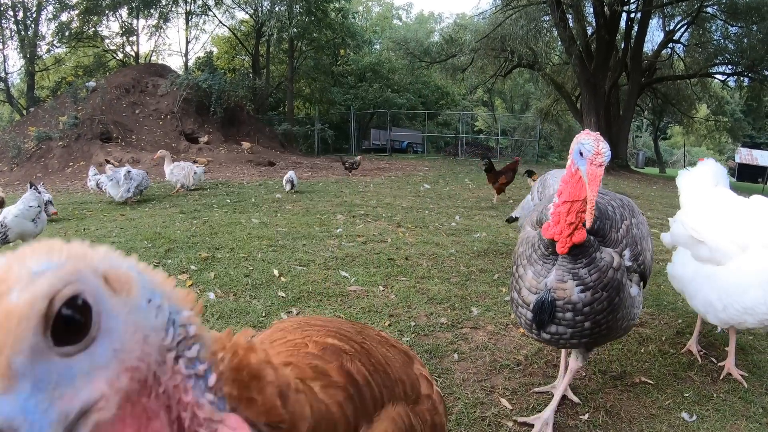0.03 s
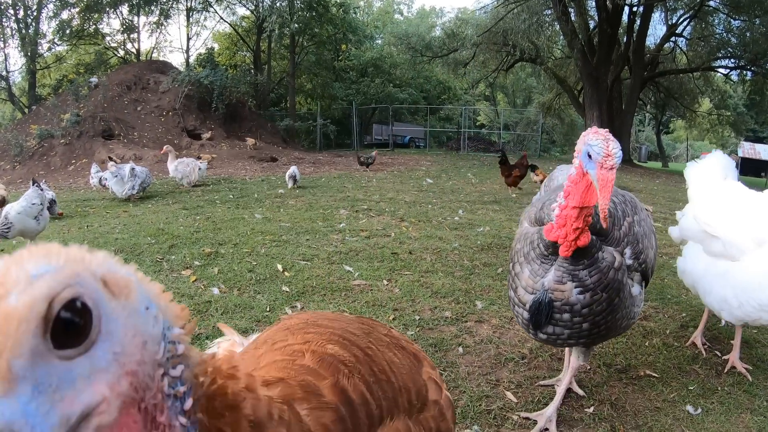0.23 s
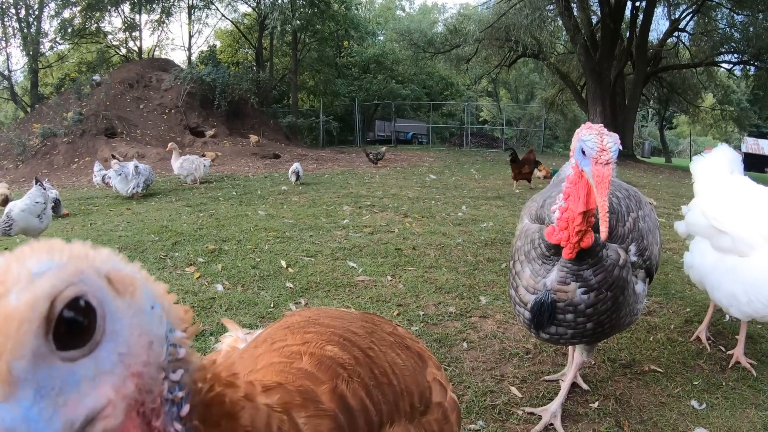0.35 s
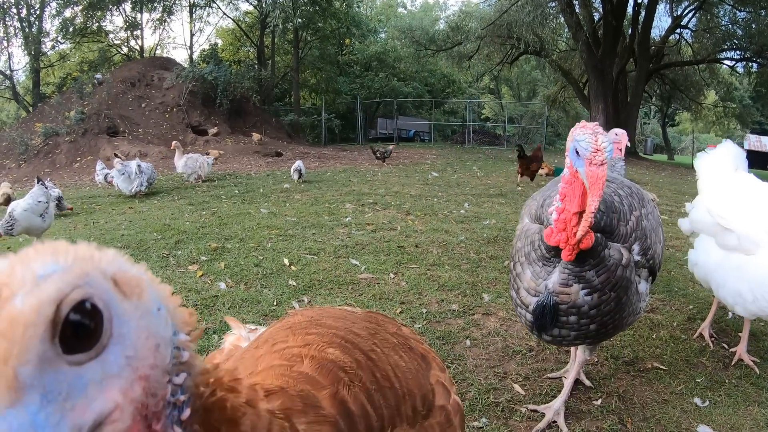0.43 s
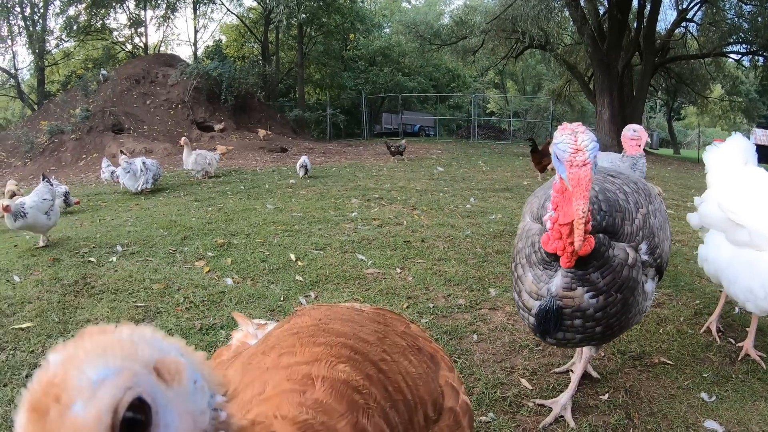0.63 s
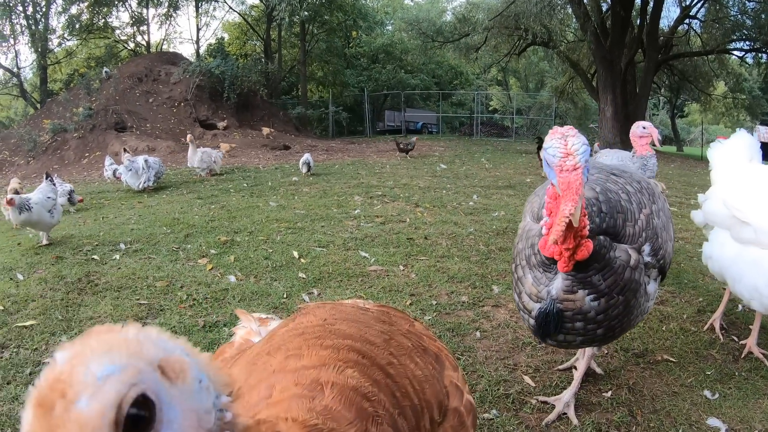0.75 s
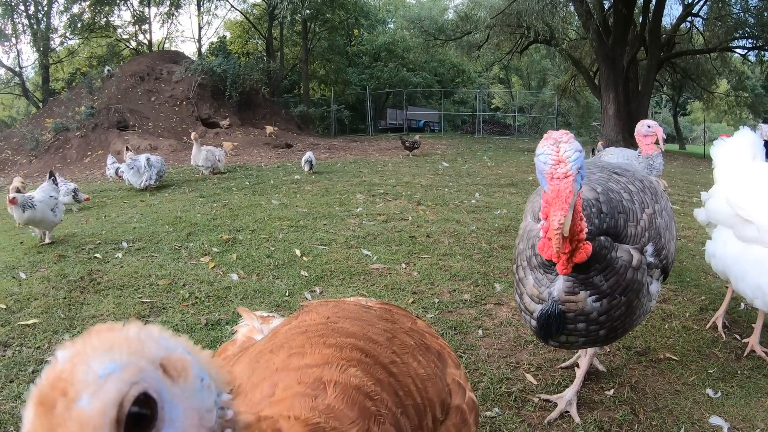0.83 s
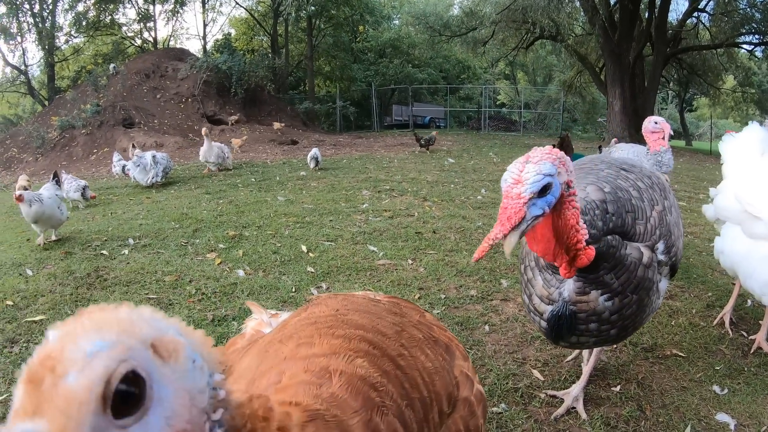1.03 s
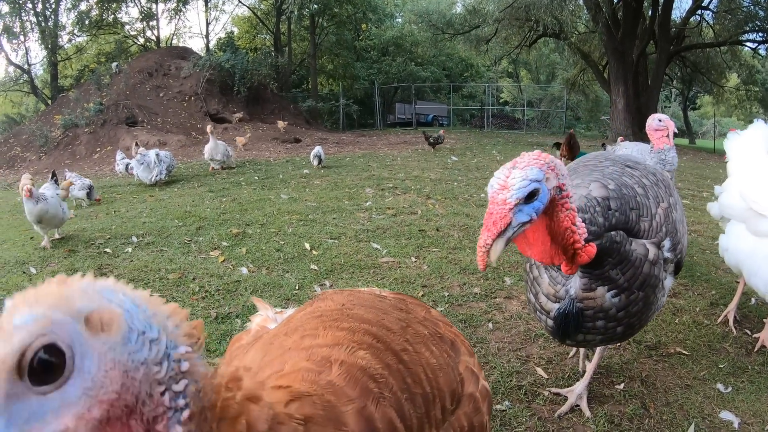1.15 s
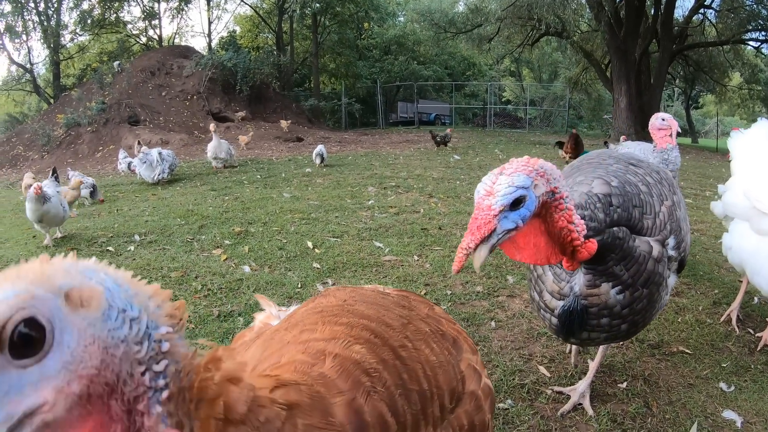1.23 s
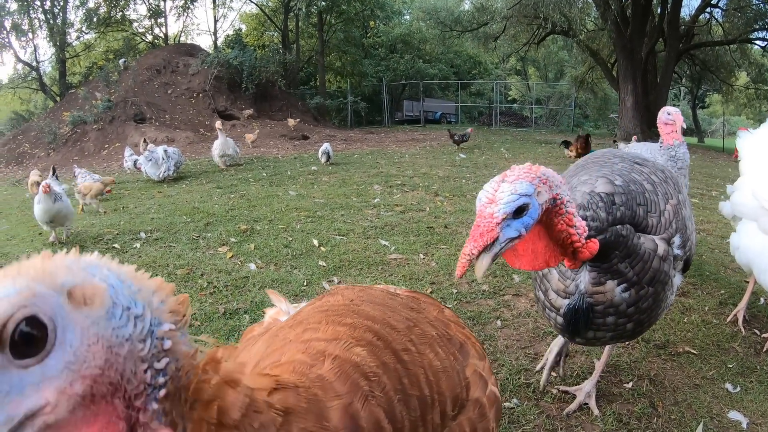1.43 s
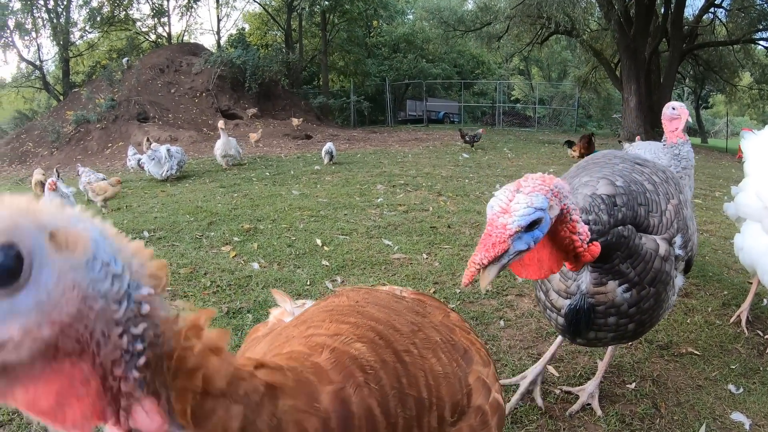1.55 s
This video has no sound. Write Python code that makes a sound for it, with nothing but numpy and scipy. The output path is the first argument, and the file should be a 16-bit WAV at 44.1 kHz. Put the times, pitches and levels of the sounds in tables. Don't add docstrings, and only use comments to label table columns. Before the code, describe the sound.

A turkey yelps loudly three times close by on the right, over a quiet farmyard.

```python
import sys
import numpy as np
from scipy import signal
from scipy.io import wavfile
from scipy.ndimage import uniform_filter1d

SR = 44100
rng = np.random.default_rng(int(sys.argv[2]) if len(sys.argv) > 2 else 0)


def to_wav(s):
    ch = np.atleast_2d(s).T
    pcm = np.round(np.clip(ch, -1, 1) * 32767)
    wavfile.write(sys.argv[1], SR, pcm.astype(np.int16))


def gain_from_db(level_db):
    decades = np.asarray(level_db, float) / 20
    return 10 ** decades


N = 70560

# pitch in Hz, strength in dB per Hz.
AIR_SPECTRUM = [(15, -41.5), (25, -7.5), (205, -1), (366, -14), (616, -18.5), (768, -18), (2200, -28.5),
                (3000, -40.5), (3900, -67), (6600, -120)]
# pitch in Hz, strength in dB per Hz.
LEAF_SPECTRUM = [(1760, -46), (3000, -12.5), (4430, -6.5), (5090, -13), (10600, -25), (11800, -41),
                 (14500, -46), (22000, -120)]
# pitch in Hz, likeness from -1 to 1.
LEFT_RIGHT_LIKENESS = [(30, 0.79), (200, 1), (1000, -0.2), (4000, 0.97), (8000, -0.38)]
# peak time in seconds, length in seconds, level in dB, centre in Hz.
RUSTLE_PUFFS = [(.112, .2, -65, 5300), (.352, .03, -71, 8000), (.85, .01, -78, 9500),
                (1.368, .012, -80, 13000), (1.43, .2, -70, 1800), (.548, .04, -58, 2900),
                (.555, .03, -72, 7000), (1.245, .04, -82, 12000), (.76, .03, -61, 3200),
                (.725, .1, -59, 2800), (.96, .1, -59, 2000), (1.05, .11, -64, 2800), (1.49, .16, -54, 320),
                (.25, .5, -62, 2600), (1.14, .12, -57, 600), (.96, .12, -53, 350)]
# start in seconds, peak level in dB, pitch in Hz.
FOOT_THUDS = [(.178, -35, 462), (.541, -40, 342), (.591, -40, 460), (1.082, -51, 548), (1.267, -48, 190),
              (1.27, -58, 580), (1.367, -50, 504), (1.378, -48.5, 246), (1.482, -38.5, 330),
              (1.531, -42, 318), (1.58, -41, 342)]
# start in
# seconds, # length in seconds, start pitch in Hz, end pitch in Hz, level in dB.
FAR_PEEPS = [(.093, .013, 2330, 2130, -62), (.103, .011, 2760, 2700, -57), (.112, .027, 2420, 1900, -60),
             (.104, .012, 5540, 5490, -61), (.111, .024, 4650, 3250, -58), (.096, .028, 6830, 6880, -63),
             (.185, .012, 7800, 7600, -70), (.385, .055, 5680, 5660, -72), (1.048, .068, 3440, 2950, -58),
             (1.055, .055, 4300, 3850, -64), (1.104, .035, 3560, 2450, -60), (1.05, .045, 2800, 2600, -66),
             (1.1, .035, 2850, 2350, -65)]
# start in seconds, length in seconds, pitch in Hz, level in dB.
HEN_NOTES = [
    (.334, .038, 1415, -52),
    (.388, .04, 1415, -55),
    (.805, .04, 1430, -65),
]

YELP_1_RISE = [(.195, 660, -62, -20), (.201, 745, -39, -17), (.212, 1010, -32, -19), (.219, 1130, -38, -3),
               (.225, 1200, -42, -2), (.232, 1200, -42, -6), (.246, 1130, -64, -18)]
YELP_1_HOLD = [(.276, 1230, -62, -14), (.286, 1140, -45, -9), (.299, 1095, -38, -11),
               (.312, 1000, -40, -24), (.32, 985, -41, -15), (.33, 995, -36, -24), (.342, 995, -35, -13),
               (.349, 995, -33.5, -21),
               (.354, 975, -34.5, -30), (.36, 970, -38, -6), (.366, 960, -34, -7), (.371, 965, -32, -18),
                 (.376, 985, -31.5, -33), (.385, 845, -34.5, -5), (.393, 905, -35, -4), (.4, 880, -30, -17),
                 (.407, 803, -31.5, -11)]
YELP_1_FALL = [(.422, 848, -29, -21), (.436, 773, -32, -9), (.454, 723, -32, -4), (.463, 755, -33, -9),
               (.481, 665, -31, 0), (.491, 652, -31.5, 1.5), (.499, 600, -36, -3), (.51, 510, -58, -13)]
YELP_2_RISE = [(.564, 600, -56, -4), (.57, 830, -29, -24), (.575, 1180, -26.5, -10),
               (.579, 1195, -24.5, -15), (.584, 1275, -22, -26), (.587, 1275, -32, -20),
               (.5875, 1640, -33, -15), (.596, 1625, -33, -16), (.612, 1610, -51, -20)]
YELP_2_FALL = [(.62, 1530, -43, -20), (.625, 1280, -35, -28), (.632, 1180, -27, -20),
               (.643, 1150, -27.5, -13), (.651, 1065, -31, -7), (.667, 990, -32, -30),
               (.678, 830, -28, -19), (.698, 738, -30, -10), (.711, 605, -33, -5), (.72, 440, -58, -7)]
YELP_3_RISE = [(.771, 590, -56, -15), (.777, 770, -26, -11), (.783, 900, -26, -16), (.786, 1200, -24, -17),
               (.79, 1272, -19, -27), (.7935, 1275, -27, -22), (.794, 1660, -28, -14),
               (.801, 1703, -32, -15), (.818, 1703, -68, -20)]
YELP_3_BREAK = [(.84, 2090, -66, -20), (.849, 2050, -40, -23), (.859, 1950, -40, -20),
                (.865, 1520, -34, -18), (.868, 1310, -29, -20), (.873, 1315, -22, -21),
                (.878, 1332, -22.5, -21)]
YELP_3_FALL = [(.885, 1240, -21, -34), (.889, 1150, -24, -26), (.898, 1165, -24.5, -17),
               (.908, 1050, -26.5, -11), (.914, 925, -27.5, -34), (.926, 880, -26.5, -33),
               (.936, 750, -28, -17), (.941, 640, -32, -2), (.946, 570, -36, -3), (.953, 450, -56, -16)]
# snap back in seconds, slack length in seconds, pitch sag as a share,
# level dip in dB.
VOICE_WARBLES = [
    (.3235, .006, .07, 9),
    (.342, .008, .11, 11),
    (.3645, .0125, .135, 12),
    (.3955, .001, 0, 11),
]
HIGH_OVERTONES_DB = [-18.5, -29.5]
# pitch in Hz, width in Hz, gain in dB.
WINDPIPE = [(1950, 250, 4), (2820, 150, 2), (3150, 110, 14), (3480, 150, 14)]

AIR_DB, LEAVES_DB, INSECT_DB = -53.5, -70, -68
INSECT_HZ, INSECT_WIDTH_HZ = 4250, 750
THUD_CYCLES, THUD_NOISE_DB = 18.4, -4.5
KNOCK_S, KNOCK_DB, KNOCK_HZ = .228, -39.5, 75
PEEP_BEND = 1.6
YARD_DB, YARD_T60_S = -35.5, 0.6
SAG_S, SNAP_S, DIP_S = .009, .006, .003
JITTER, SHIMMER_DB = .003, .5
BREATH_DB, PIPE_DIRECT_DB = -31, -12
VOICE_PAN_DB, TOP_PAN_DB, AIR_PAN_DB = -9, -4.5, -1.2
TOP_HZ, CUTOFF_HZ = 2100, 12500


def rms_one(x):
    return x / np.sqrt(np.mean(x ** 2) + 1e-20)


def at_hz(points, hz):
    points = np.array(points)
    return np.interp(np.log(hz), np.log(points[:, 0]), points[:, 1])


def drift(rate):
    r = np.exp(-2 * np.pi * rate / SR)
    noise = rng.standard_normal(N + SR // 2)
    return rms_one(signal.lfilter([1], [1, -2 * r, r * r], noise)[SR // 2:])


def resonance(hz, width_hz):
    r = np.exp(-np.pi * width_hz / SR)
    return (1 - r * r) / 2 * np.array([1, 0, -1]), [1, -2 * r * np.cos(2 * np.pi * hz / SR), r * r]


def butter(x, order, hz, kind="low"):
    return signal.sosfilt(signal.butter(order, hz, kind, fs=SR, output="sos"), x)


def pan(x, db):
    return x * gain_from_db(np.array([[db / 2], [-db / 2]])) * 2 / (gain_from_db(db / 2) + gain_from_db(-db / 2))


def banded_noise(spectrum, low_hz, count, patchy_db):
    out, together = 0, drift(4.7)
    edges = low_hz * 2 ** (np.arange(count + 1) / 3)
    white = rng.standard_normal((2, 2, N))
    for k, (low, high) in enumerate(zip(edges, edges[1:])):
        mid, side = butter(white[k % 2], 2, [low, high], "band")
        hz = np.sqrt(low * high)
        alike = np.clip(at_hz(LEFT_RIGHT_LIKENESS, hz), -1, 1)
        flicker = patchy_db * (0.66 * together + drift(22))
        gain = gain_from_db(at_hz(spectrum, hz) + flicker)
        out = out + gain * (np.sqrt(1 + alike) * mid + np.sqrt(1 - alike) * side * [[1], [-1]])
    return rms_one(out)


def air_and_traffic():
    return gain_from_db(AIR_DB) * banded_noise(AIR_SPECTRUM, 22, count=21, patchy_db=.9)


def leaves():
    return gain_from_db(LEAVES_DB) * banded_noise(LEAF_SPECTRUM, 2800, count=7, patchy_db=1.0)


def insects():
    noise = rng.standard_normal((2, N)) + 0.5 * rng.standard_normal(N)
    ring = resonance(INSECT_HZ, INSECT_WIDTH_HZ)
    level = gain_from_db(INSECT_DB + 0.53 * drift(25))
    return level * rms_one(signal.lfilter(*ring, signal.lfilter(*ring, noise)))


def rustles():
    t, out = np.arange(N) / SR, 0
    grains = rng.standard_normal((2, N)) * gain_from_db(1.9 * drift(300))
    grains = grains + 2.1 * rng.standard_normal(N)
    for s, length, db, hz in RUSTLE_PUFFS:
        band = butter(grains, 3, [hz / 1.4, hz * 1.283], "band")
        steepness = np.where(t < s, 10, 1.5)
        out = out + gain_from_db(db) * rms_one(band) * np.exp(-(steepness * (t - s) / length) ** 2)
    return out


def thuds():
    out, t = np.zeros(N + SR), np.arange(SR // 5) / SR
    noise = rng.standard_normal(N + SR)
    for s, db, hz in list(FOOT_THUDS) + [(KNOCK_S, KNOCK_DB, KNOCK_HZ)]:
        i = int(s * SR)
        rough = rms_one(signal.lfilter(*resonance(hz, 0.15 * hz), noise[i:i + len(t)]))
        rise = 1 - np.exp(-t * hz * 1.35)
        fade = gain_from_db(-60 * t * np.sqrt(350 * hz) / THUD_CYCLES)
        tone = np.sin(2 * np.pi * hz * t)
        out[i:i + len(t)] += gain_from_db(db + 4.5) * rise * fade * (tone + gain_from_db(THUD_NOISE_DB) * rough)
    return butter(out[:N], 2, 1500)


def peeps():
    out, wobble, flutter = np.zeros(N + SR), drift(200), gain_from_db(2.0 * drift(90))
    for s, length, start_hz, end_hz, db in FAR_PEEPS:
        u = np.linspace(0, 1, int(length * SR))
        i = int(s * SR)
        glide = start_hz + (end_hz - start_hz) * u ** PEEP_BEND
        hz = glide * (1 + .006 * wobble[i:i + len(u)])
        whistle = np.sin(2 * np.pi * np.cumsum(hz) / SR)
        out[i:i + len(u)] += gain_from_db(db + 2.0) * np.sin(np.pi * u) ** .5 * whistle
    return out[:N] * flutter


def hen():
    t, out = np.arange(N) / SR, 0
    for s, length, hz, db in HEN_NOTES:
        u = np.clip((t - s) / length, 0, 1)
        phase = 2 * np.pi * hz * t
        out = out + gain_from_db(db) * np.sin(np.pi * u) * (.5 * np.sin(phase) + np.sin(2 * phase))
    return out


def yard(x):
    t = np.arange(SR // 2) / SR
    dull = signal.lfilter([1], [1, -.6], rng.standard_normal((2, len(t))))
    tail = dull * gain_from_db(-60 * t / YARD_T60_S) * (t > .012)
    tail = tail / np.sqrt(np.sum(tail ** 2) / 2)
    return gain_from_db(YARD_DB) * signal.fftconvolve(x[None], tail, axes=1)[:, :N]


def windpipe(high, db):
    ringing = sum(gain_from_db(gain) * signal.lfilter(*resonance(hz, width), high) for hz, width, gain in WINDPIPE)
    high = gain_from_db(PIPE_DIRECT_DB) * high + gain_from_db(np.minimum(db + 34, 0) / 2) * ringing
    return butter(high, 12, 3620)


def turkey():
    t = np.arange(N) / SR
    hz, db, second_db = np.full(N, 800.), np.full(N, -120.), np.zeros(N)
    yelp_1_slide = YELP_1_HOLD + YELP_1_FALL
    yelp_2 = YELP_2_RISE + YELP_2_FALL
    yelp_3_slide = YELP_3_BREAK + YELP_3_FALL
    for rows in (YELP_1_RISE, yelp_1_slide, yelp_2, YELP_3_RISE, yelp_3_slide):
        s, *columns = np.transpose(rows)
        on = (t >= s[0]) & (t <= s[-1])
        hz[on], db[on], second_db[on] = (np.interp(t[on], s, c) for c in columns)

    first_db, upper_hz = np.zeros(N), hz
    for s, length, sag, dip_db in VOICE_WARBLES:
        slack = sag * np.clip((t - s + length) / SAG_S, 0, 1)
        hz = hz * (1 - slack * (t < s))
        upper_hz = upper_hz * (1 - slack * (t < s + SNAP_S))
        first_db = first_db - dip_db * np.exp(-((t - s) / DIP_S) ** 2)

    pitches = uniform_filter1d([hz, upper_hz], size=30) * (1 + JITTER * drift(160))
    phase, upper = 2 * np.pi * np.cumsum(pitches, axis=1) / SR
    level = uniform_filter1d(gain_from_db(db + 1.0 + SHIMMER_DB * drift(84)), size=60)

    high = 0
    for k, rel_db in enumerate(HIGH_OVERTONES_DB):
        strength = gain_from_db(rel_db + (db + 20.0) / 2 + second_db / 2)
        high = high + strength * np.sin((k + 3) * upper + k)
    breath = gain_from_db(BREATH_DB) * rng.standard_normal(N)
    high = windpipe(level * (high + breath) + 1e-18, db)
    low = gain_from_db(first_db) * np.sin(phase) + gain_from_db(second_db) * np.sin(2 * upper + 1)
    return level * low + high


def scene():
    voice, far = turkey(), peeps()
    air, hiss = air_and_traffic(), leaves()
    echoes = yard(voice + gain_from_db(25.0) * far)
    top = butter(voice, 1, TOP_HZ, "high")
    bird = pan(voice - top, VOICE_PAN_DB) + pan(top, TOP_PAN_DB)
    distance = pan(hen(), 12.0) + pan(far, -2.5) + pan(hiss, -.3)
    ground = pan(air + insects() + rustles() + thuds(), AIR_PAN_DB)
    return bird + distance + echoes + ground


def low_pass(x):
    return signal.sosfilt(signal.butter(12, 14040, fs=SR, output="sos"), x)


def record(dry):
    no_rumble = butter(dry, 3, 42, "high")
    mix = butter(no_rumble, 3, CUTOFF_HZ)
    return low_pass(mix)


dry = scene()
out = record(dry)
to_wav(out)
```